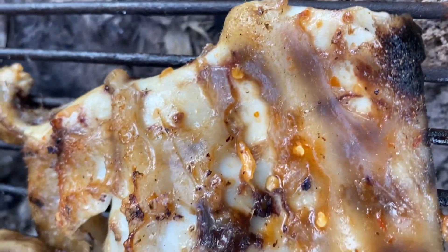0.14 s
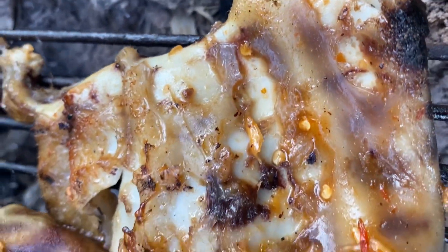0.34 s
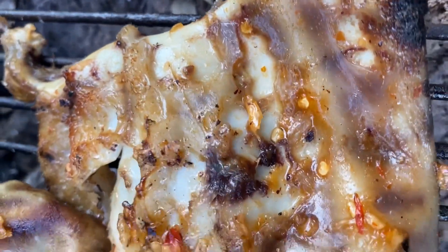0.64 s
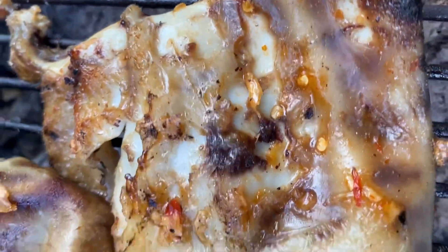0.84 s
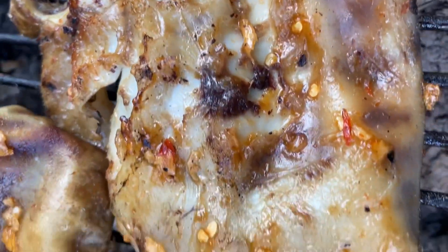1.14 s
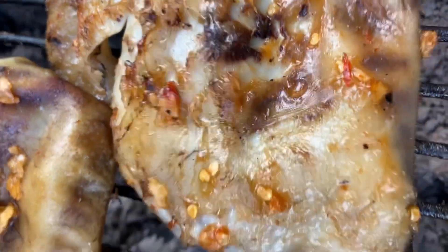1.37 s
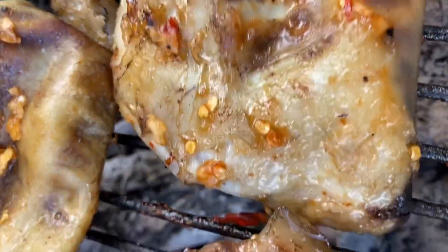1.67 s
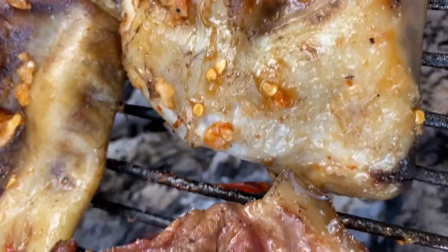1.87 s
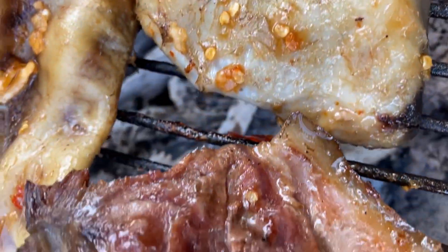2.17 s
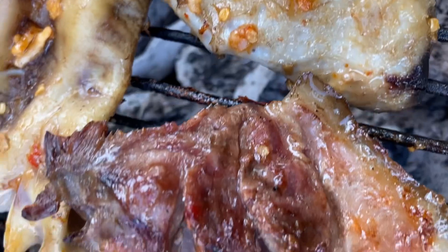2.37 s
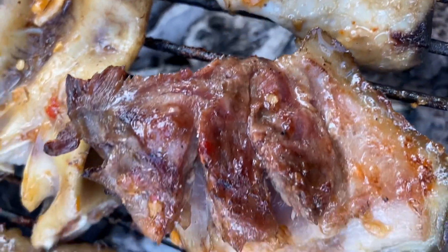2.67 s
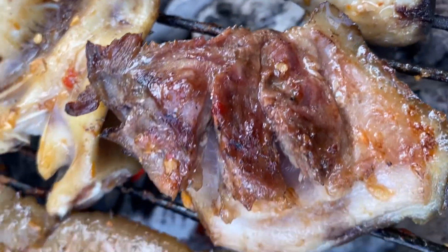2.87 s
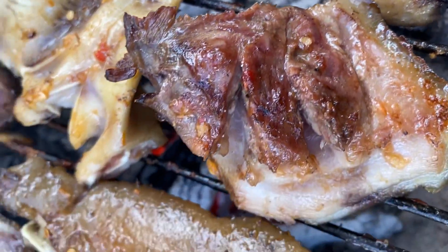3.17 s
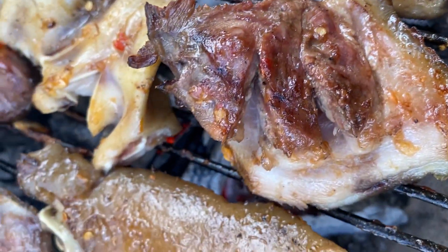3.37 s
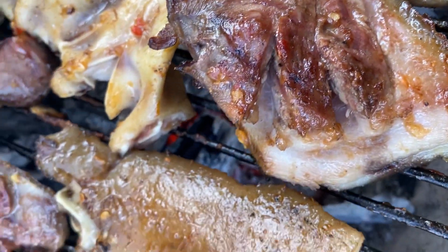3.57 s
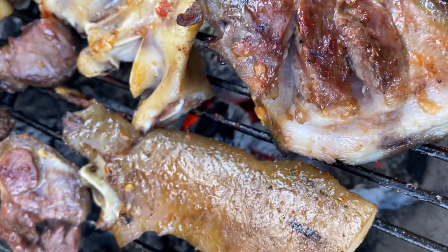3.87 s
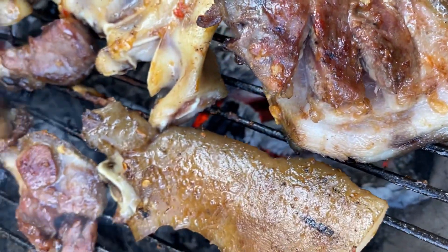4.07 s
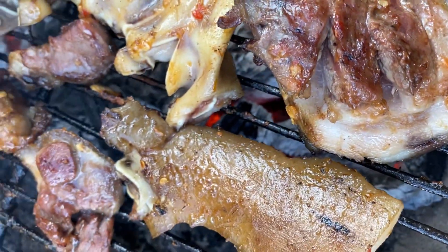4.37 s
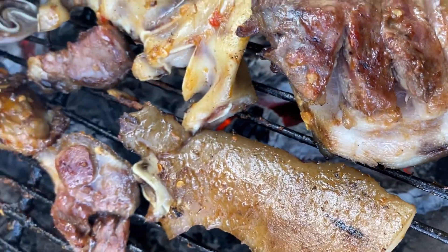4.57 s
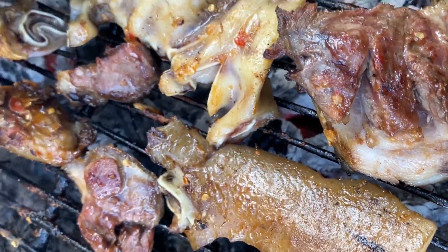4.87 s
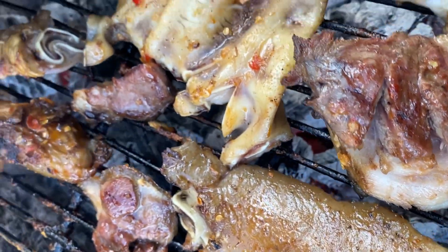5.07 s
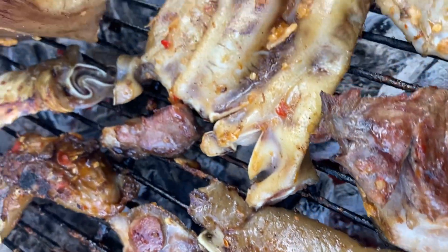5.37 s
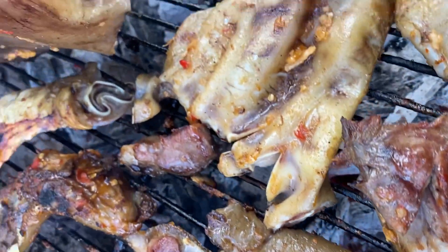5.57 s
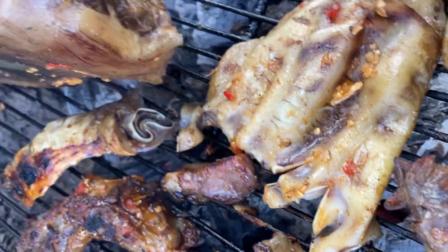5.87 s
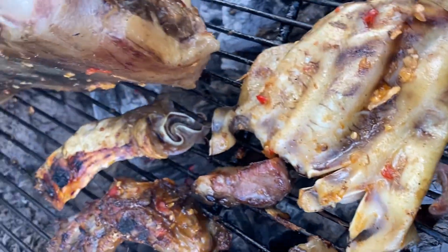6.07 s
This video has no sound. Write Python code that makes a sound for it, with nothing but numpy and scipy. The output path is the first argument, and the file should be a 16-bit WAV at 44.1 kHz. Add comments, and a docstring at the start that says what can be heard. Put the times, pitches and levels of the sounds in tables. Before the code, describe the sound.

Close outdoor grill sound in stereo, crisp and dry, with soft low rumble of fire and moving air throughout. At 0 s only a faint steady crackle and a few pops, one sharp at the start. From about 0.6 s fine, dense sizzling fades up and grows until 1.9 s; a tiny brittle charcoal clink comes at 1.1 s, a cluster of bright snaps around 1.3 s and a soft hollow blup at 1.7 s. At 2.3 s a drip hits the coals: a fuller steamy hiss pulses twice, with a barely audible moan and a swell of fire burble, gone by 3.1 s amid strong spits, the sharpest near 3.06 s. From 3.1 s a thinner, more uneven sizzle continues, dipping around 4.1 s, reviving with busier pops near 4.9 and 5.5 s, then easing by 6.2 s.

```python
"""Meat sizzles over charcoal outdoors while a handheld camera drifts close above it.
Ribs, a drip and a strip of skin sizzle as crowds of tiny noise bursts, each around its own pitch.
Bigger spits are sharp noise snaps; soft blups, a low gust thump and a faint high ping are short
sliding tones. The drip flashes to steam on the coals with a faint moan, a gliding tone. A lump of
charcoal clinks as fading tones. Shaped noise makes the fire burble and rumble; faint hums come and go."""
import sys
import numpy as np
from scipy import signal
from scipy.fft import rfft, irfft
from scipy.io import wavfile
from scipy.ndimage import uniform_filter1d

SR = 44100
rng = np.random.default_rng(int(sys.argv[2]) if len(sys.argv) > 2 else 0)


def persist_wave(psi):
    """Save psi, clipped to +-1, as 16-bit WAV."""
    counts = np.round(np.clip(psi, -1, 1) * 32767).astype(np.int16)
    wavfile.write(sys.argv[1], SR, np.atleast_2d(counts).T)


N = 275000
TIME = np.arange(N) / SR
HZ = np.fft.rfftfreq(N, 1 / SR)
EDGE_HZ = 15820  # nothing much is heard above this

# how strongly the ribs sizzle as the camera passes, before the fizz and fry trims: (time [s], level [dB])
RIBS_LEVEL = [(0.58, -57.5), (0.78, -46), (1.04, -45), (1.15, -40), (1.42, -40.5), (1.55, -38.5),
              (1.85, -37), (2.05, -41.5), (2.2, -41.5)]
# tone colour of the ribs: (frequency [Hz], relative level per Hz [dB])
RIBS_TONE = [(500, -4.5), (900, -18), (1400, -5.5), (1850, -10.5), (2700, 0), (3300, -1.5), (4200, -8),
             (5000, -2.5), (6100, -6.5), (7800, -2.5), (11500, -3.5), (13500, 0.5), (15500, -1.5)]


def ribs():
    """Fat on the ribs bursts in many tiny bubbles."""
    grains = bubbles(per_s=8000, spread_db=2.0, burst_s=0.0006, breadth=0.097, clump_db=2.0, hiss_db=-7)
    return sizzle(RIBS_LEVEL, RIBS_TONE, grains, fizz_db=-3.5, fry_db=-11.5, drying_db_per_s=0.54,
                  attack_s=0.015, release_s=0.045, low_hz=501, surge_db=1.5)


# how strongly the skin sizzles as the camera passes, before the fizz and fry trims: (time [s], level [dB])
SKIN_LEVEL = [(3.2, -45), (3.45, -44.5), (3.62, -41.5), (3.77, -45), (4.12, -51), (4.33, -46.5),
              (4.77, -47), (4.92, -41.5), (5.22, -44), (5.5, -42), (5.85, -45), (6.24, -52)]
# tone colour of the skin: (frequency [Hz], relative level per Hz [dB])
SKIN_TONE = [(500, 1), (900, -12), (1400, -6.5), (1900, -7), (2400, -5), (2850, -10.5), (3400, -2),
             (4100, -1), (4900, -5.5), (6000, -6), (7700, 0), (9300, -9.5), (11700, 2.5), (14000, -2),
             (15500, -4)]


def skin():
    """Fat on the strip of skin bursts in fewer, more uneven bubbles."""
    grains = bubbles(per_s=5000, spread_db=2.5, burst_s=0.0006, breadth=0.09, clump_db=1.65, hiss_db=-2.5)
    return sizzle(SKIN_LEVEL, SKIN_TONE, grains, fizz_db=-3.5, fry_db=-13.0, drying_db_per_s=0.9,
                  attack_s=0.11, release_s=.074, low_hz=568.0, surge_db=1.66)


# tone colour of the drip on the coals: (frequency [Hz], relative level per Hz [dB])
DRIP_TONE = [(400, 1), (750, 2.5), (1000, -10), (1600, -8.5), (2000, -2.5), (2400, -2), (3100, -6.5),
             (4250, -1), (5700, -9), (6300, -2), (7500, 2.5), (8400, -3), (11500, -1.56), (13000, 0.4),
             (15500, -6)]


def drip():
    """A drip boils away on the hot coals in longer bursts of steam."""
    grains = bubbles(per_s=8000, spread_db=3.5, burst_s=0.00088, breadth=0.1, clump_db=1.23, hiss_db=-4.5)
    return sizzle(boiling(), DRIP_TONE, grains, fizz_db=-2, fry_db=-9.0, drying_db_per_s=0.5,
                  attack_s=0.06, release_s=0.1, low_hz=298, surge_db=0.5)


DRIP_S, DRIP_LASTS_S = 2.27, .76  # when the drip lands, and how long until it is dry
SIMMER_DB, SIMMER_SAG_DB_PER_S = -39.5, 3  # the simmer starts here and sinks, before the trims
SETTLE_S = .09  # each flash fades back to the simmer
# the drip flashes into steam: (time after landing [s], level above the simmer [dB])
STEAM_FLASHES = [(0, 4.5), (0.12, 5), (0.27, 0.8)]


def boiling(count=84):
    """Traces the drip's level from its landing until it is dry, as rows (time [s], level [dB])."""
    s = DRIP_S + np.linspace(0, DRIP_LASTS_S, count)
    db = SIMMER_DB - SIMMER_SAG_DB_PER_S * (s - DRIP_S)
    for after_s, flash_db in STEAM_FLASHES:
        since_s = s - DRIP_S - after_s
        started = s >= DRIP_S + after_s
        db = db + flash_db * started * np.exp(-abs(since_s) / SETTLE_S)
    return np.transpose([s, db])


# tone colour of the whole grill: (frequency [Hz], relative level per Hz [dB])
GRILL_TONE = [(500, -7.5), (900, -11.5), (1400, -5), (2100, -3.5), (2700, -3), (3500, -5), (5500, -3),
              (8000, -2), (11500, 3), (15500, 0)]


def grill():
    """Bubbles all over the grill blend into a faint, steady crackle."""
    grains = bubbles(per_s=4500, spread_db=3.5, burst_s=0.0006, breadth=0.098, clump_db=0.5, hiss_db=-1.5)
    gain = amp(read(GRILL_TONE, HZ)) * high_pass(HZ, 710)
    return amp(-50.0) * unit(irfft(rfft(grains) * gain, N))


def sizzle(rows, colour, grains, fizz_db, fry_db, drying_db_per_s, attack_s, release_s, low_hz, surge_db):
    """Small bubbles fizz in the treble; larger wet ones fry below and slowly dry out."""
    s, db = np.transpose(rows)
    spectrum = rfft(grains) * amp(read(colour, HZ)) * high_pass(HZ, low_hz)
    small = high_pass(HZ, 6200) ** 4  # share of the small bubbles at each frequency
    fizz = irfft(spectrum * small, N) / band_rms(spectrum, 6500, 16000)
    fry = irfft(spectrum * (1 - small), N) / band_rms(spectrum, 2000, 6000)
    surging_db = np.interp(TIME, s, db) + surge_db * drift(7.8)
    level = amp(surging_db) * presence(s[0], s[-1], attack_s, release_s)
    drying_db = fry_db - drying_db_per_s * (TIME - s[0])
    return level * (fizz * amp(fizz_db) + fry * amp(drying_db))


def bubbles(per_s, spread_db, burst_s, breadth, clump_db, hiss_db, count=64, size=256):
    """Tiny bursts of uneven size, each around its own pitch, come in clumps over a hiss of vapour."""
    t = np.arange(size) / SR
    height = np.sqrt(np.linspace(0, 1, size // 2 + 1))  # pitch scale: 0 lowest, 1 highest
    out = np.zeros((2, N))
    for pitch in np.linspace(0, 1, count):
        ring = causal(np.exp(-((height - pitch) / breadth) ** 2) + 0.019)
        noise = unit(rng.standard_normal((2, size)) * np.exp(-t / burst_s))
        burst = irfft(rfft(noise) * ring)
        # the pitches share the per_s bursts, which start at random moments
        chance = rng.random(N) * SR * count / per_s
        at = np.flatnonzero(chance < 1)
        # most bursts are small and a few are much louder
        strength = amp(spread_db * np.minimum(-np.log(chance[at] + 1e-9), 5))
        place = (at[:, None] + np.arange(size)).ravel()
        for port in range(2):
            out[port] += np.bincount(place, np.outer(strength, burst[port]).ravel(), N)[:N]
    vapour = amp(hiss_db) * rng.standard_normal((2, N))
    return unit((unit(out) + vapour) * amp(clump_db * drift(61)))


SOUND_M_PER_S = 343
# the camera slowly draws back, so the reflection travels further: (time [s], extra path [m])
REFLECTION_PATH = [(0, .226), (0.5, .253), (1.5, .265), (3.6, .272), (4.3, .275), (5.1, .305), (5.6, .317),
                   (6.24, .345)]


def glance(pair, echo_db):
    """Adds a reflection off the meat; as its path grows, its colouring sinks in pitch."""
    delay_s = np.interp(TIME, *np.transpose(REFLECTION_PATH)) / SOUND_M_PER_S
    earlier = TIME - delay_s
    echo = np.array([np.interp(earlier, TIME, x) for x in pair])
    return pair + amp(echo_db) * echo


def meat():
    """Joins all the sizzling; the direct sound of grill, ribs and skin also reflects off the meat."""
    return glance(grill() + ribs() + skin(), echo_db=-11.0) + drip()


# a bright pop rings high, a dull one low
POP_RING_HZ, RING_OCTAVES_PER_TILT, TOP_RING_HZ = 4470, 0.45, 12500
# the loudest spits of fat and cracks of charcoal, before a common trim:
# (time [s], level [dB], treble tilt [dB per octave], decay [s])
LOUD_SPITS = [(0.064, -27, -4.5, 0.0011), (0.086, -38, -2, 0.00063), (0.1659, -45, 13.5, .0005),
              (0.2762, -39, 1, .0008), (0.311, -42, -5.5, 0.0018), (0.3568, -35.5, 7, 0.00054),
              (0.457, -38.5, 1, 0.00076), (0.6475, -40, -3, 0.00073), (0.7806, -34, 3, 0.00059),
              (0.821, -56, 3, .0009), (0.9065, -32, 2.5, 0.00056), (0.9563, -33, 3, 0.00043),
              (0.9686, -39, 9, .0006), (0.9934, -34, 7, 0.00048), (1.0003, -33.5, 4, 0.00074),
              (1.0931, -33, 1, 0.00076), (1.1127, -27, -1, 0.00047), (1.1143, -34, 9, 0.0017),
              (1.1205, -48, 1.5, 0.0017), (1.1599, -37, -1.5, 0.00069), (1.2606, -37, 6, 0.00043),
              (1.2854, -30, 15, .0004), (1.3001, -38, 1, .0005), (1.3111, -26, 2, 0.00054),
              (1.3318, -25, 4, .0005), (1.3504, -41, 4, 0.00089), (1.3608, -25, 8, 0.0011),
              (1.4303, -32, 3, .0005), (1.4388, -29, 11, .0005), (1.4499, -26, 10, .0005),
              (1.464, -31.5, 1.5, 0.00049), (1.5872, -39, 8, .0005), (1.6366, -37, 1, .0006),
              (1.7017, -30.5, -7, 0.0005), (1.7596, -28, 3, 0.00066), (1.9217, -32, 3, 0.00046),
              (1.9412, -32.5, 3, .0005), (1.9817, -39, 5, .0005), (2.0158, -37, 9, .0005),
              (2.0212, -29, 0.5, 0.00098), (2.039, -43.5, -4.5, .0006), (2.1442, -41, 0, 0.00055),
              (2.1493, -25, 4, 0.0015), (2.2128, -32, 9, .0008), (2.2427, -40, 13, .0007),
              (2.2782, -29, 7, 0.00072), (2.3029, -23, 0, 0.0018), (2.3221, -37, -6.5, 0.00051),
              (2.3452, -25, 11, .0006), (2.3508, -26, -0.5, 0.00055), (2.4095, -25, 7, 0.00072),
              (2.5566, -26, 11, 0.00054), (2.5955, -37, 5, .0005), (2.6174, -27, 0, 0.00049),
              (2.6865, -32, 7, .00076), (2.7117, -32, 0, .0006), (2.7407, -29, 5, .0006),
              (2.7445, -28, 0.5, 0.00081), (2.8262, -36, -3, 0.0011), (2.8601, -29, 0, .0007),
              (2.8892, -30, -1, 0.00066), (2.9024, -23, 6, .001), (2.9095, -28, 10, .0005),
              (2.9267, -37, 0, .0006), (2.9672, -33.5, -1, .0009), (3.0004, -29, 3, .0006),
              (3.0575, -16, 5, 0.00044), (3.1001, -40, 3, 0.00068), (3.1507, -25, 0, 0.00059),
              (3.1993, -29, 13, 0.00074), (3.2165, -34, 13, 0.00052), (3.2579, -35, 10, .0005),
              (3.2702, -28.5, 4, 0.00073), (3.281, -30, 3, 0.0005), (3.323, -31.5, 1, 0.00063),
              (3.3309, -26, 10, 0.00079), (3.4347, -31, 10, .0005), (3.4473, -35, -1, 0.00048),
              (3.4607, -30.5, 6, 0.00082), (3.5724, -35.5, 4, .0005), (3.5076, -41, -6, .0007),
              (3.6305, -34, 0.5, .0007), (3.6718, -33, 3, .0006), (3.7556, -44, -3, .0008),
              (3.7715, -41, -2, .0008), (3.8399, -36, 1, 0.00055), (3.8558, -42, 2, .0006),
              (3.937, -31, 5, .00053), (4.0693, -37, 3, .0005), (4.2098, -43, -5, .0006),
              (4.2815, -37, 1, .0005), (4.2874, -35, 9, 0.00046), (4.3228, -41, 0.5, 0.00069),
              (4.3589, -32.5, 1, 0.00049), (4.464, -36, -1.5, 0.00037), (4.5316, -35, 1, .0005),
              (4.5466, -33, 9, .0006), (4.5687, -38, 13, 0.00046), (4.6177, -33.5, 1, .0006),
              (4.6575, -32, -1, 0.00043), (4.6616, -30, 8, 0.00076), (4.6871, -40, 7, .0005),
              (4.7712, -28, 4.5, 0.00035), (4.7802, -37, -3, 0.00085), (4.8448, -49, 5, .0006),
              (4.859, -32, 0, 0.0013), (4.8864, -25.5, 2, 0.00085), (4.9461, -35, -1, 0.0006),
              (4.9796, -39, 4, 0.00045), (5.0263, -31, 21, .0004), (5.036, -32, 12, .0004),
              (5.074, -29, 2.5, 0.002), (5.0978, -36, 8, .0005), (5.1075, -42, -9, 0.00073),
              (5.1544, -46, 2, .0006), (5.3594, -39, -8, 0.00055), (5.3815, -31, 6, 0.0007),
              (5.409, -31.5, 0, 0.00066), (5.4269, -44, 6, .0005), (5.4609, -34, 2, .0006),
              (5.5003, -26.5, 0.5, 0.0015), (5.5218, -28, 17, .0004), (5.548, -29, 4, 0.00058),
              (5.553, -38, 4, 0.00066), (5.585, -28.5, 5, 0.00066), (5.6159, -33, 6, .0005),
              (5.6695, -42, -0.5, 0.00072), (5.7124, -34, 8, .0005), (5.7239, -35, 8, .0005),
              (5.8412, -38, 17, .0005), (5.8865, -31, 7, .0005), (5.8988, -34, 1, 0.00088),
              (5.9825, -37, -3, .0008), (5.9882, -27, 1.5, 0.0038), (6.0913, -43, -1, .0006),
              (6.1182, -41, 2, .0006), (6.1915, -46, -8, .0005)]


def spits(frying):
    """Loud spits at set moments join lesser ones that follow the frying."""
    lesser = small_spits(frying, above_db=-7.0, spread_db=0, tilt_db=0.5, tilt_spread_db=4.5,
                         decay_s=0.00027)
    return pops([*LOUD_SPITS, *lesser], level_db=-1.0, ring_db=1.5, ring_width=0.29,
                spray_db=-26, spray_s=0.043, low_hz=313)


def pops(rows, level_db, ring_db, ring_width, spray_db, spray_s, low_hz, size=2048):
    """A blister snaps open and throws a short, faint spray of droplets."""
    out, t, hz = np.zeros((2, N)), np.arange(size) / SR, np.fft.rfftfreq(size, 1 / SR)
    for s, db, tilt_db, decay_s in rows:
        ring_hz = min(POP_RING_HZ * 2 ** (RING_OCTAVES_PER_TILT * tilt_db), TOP_RING_HZ)
        envelope = np.exp(-t / decay_s) + amp(spray_db) * np.exp(-t / spray_s)
        slope_db = tilt_db * np.log2(np.clip(hz, 900, 11000) / 4000)
        ring = np.exp(-(np.log((hz + 1) / ring_hz) / ring_width) ** 2)
        gain = amp(slope_db + ring_db * ring) * high_pass(hz, low_hz) / (1 + (hz / EDGE_HZ) ** 20)
        snap = irfft(rfft(rng.standard_normal((2, size)) * envelope) * causal(gain))
        # equal energy for every snap, as if packed into one millisecond
        snap /= np.sqrt(np.sum(snap ** 2, 1, keepdims=True) / (SR * .001))
        add(out, s, amp(db + level_db) * snap)
    return out


def small_spits(frying, above_db, spread_db, tilt_db, tilt_spread_db, decay_s, count=150):
    """Lesser spits come at random, more and louder where the meat fries harder: rows as for pops."""
    power = uniform_filter1d(np.mean(frying ** 2, 0), SR // 5) + 1e-12
    due = np.cumsum(power ** (1 / 4))
    when, strength, bright = rng.random((count, 3)).T
    s = np.interp(when, due / due[-1], TIME)
    frying_db = 10 * np.log10(np.interp(s, TIME, power))
    db = frying_db + above_db + spread_db * (2 * strength - 1)
    tilt = tilt_db + tilt_spread_db * (2 * bright - 1)
    return np.transpose([s, db, tilt, np.full(count, decay_s)])


# soft blups, a low gust thump and a faint high ping, before the swell shape and a common trim:
# (time [s], level [dB], first pitch [Hz], last pitch [Hz], length of the slide [s])
SHORT_TONES = [(0.061, -40, 397, 200, 0.02), (0.135, -35.5, 564, 264, 0.0075),
               (0.473, -43.5, 430, 324, 0.018), (0.645, -44, 900, 746, 0.0057),
               (0.818, -43, 950, 600, 0.0044), (1.11, -35.5, 475, 300, 0.0074),
               (1.258, -28.5, 605, 280, 0.0057), (1.265, -33, 504, 400, 0.012),
               (1.7, -19.5, 750, 149, 0.0086), (2.816, -41, 640, 556, 0.017),
               (3.366, -26.5, 67.4, 72.6, 0.044), (3.573, -35.5, 340, 190, 0.015),
               (4.534, -47, 1760, 1910, .018), (4.999, -43.5, 444, 423, .026),
               (5.237, -36, 263, 174, 0.038)]


def short_tones(level_db):
    """Each is a short swelling tone that slides in pitch."""
    out = np.zeros((2, N))
    for s, db, first_hz, last_hz, length_s in SHORT_TONES:
        u = np.arange(int(2 * length_s * SR)) / (length_s * SR)  # 1 when the slide ends
        hz = first_hz * (last_hz / first_hz) ** np.minimum(u, 1)
        swell = (u / 0.52) ** 2 * np.exp(2 * (1 - u / 0.46))
        tone = np.sin(2 * np.pi * np.cumsum(hz) / SR)
        add(out, s, amp(db + level_db) * swell * tone)
    return out


# a lump of charcoal splits in a quick run of snaps, before a common trim: (time [s], level [dB])
LUMP_SNAPS = [(1.1124, -39), (1.1141, -29), (1.1208, -38)]
# what the lump rings with: (frequency [Hz], level [dB], time to fade by 60 dB [s])
LUMP_RINGS = [(1360, -5, .015), (2650, -6, 0.027), (3320, -2.5, 0.029), (3650, -2, .012),
              (4760, -12, 0.032), (7220, -3, .025)]


def charcoal(level_db):
    """Each snap sets the brittle lump clinking at several pitches."""
    out, t = np.zeros((2, N)), np.arange(SR // 10) / SR
    for s, db in LUMP_SNAPS:
        clink = np.zeros((2, len(t)))
        for hz, mode_db, t60 in LUMP_RINGS:
            tone = np.sin(2 * np.pi * (hz * t + rng.random((2, 1))))
            clink += amp(mode_db - 60 * t / t60) * tone
        add(out, s, amp(db + level_db) * clink)
    return out


# steam moaning from the drip, before the left and right trims:
# (start [s], length [s], pitch [Hz], glide [Hz per s], level [dB])
STEAM_MOAN = (2.3, 0.36, 388, 100, -49.5)


def moan():
    """Steam escaping from the drip sounds a faint rising note, almost all on the right."""
    return note(STEAM_MOAN, left_db=-24.5, right_db=1.0, waver=0.0052, fade_s=0.073)


FLARE_DB, FLARE_DECAY_S = 10.5, 0.65  # the fire flares when the drip lands
# the burble without the flare, stronger under the ribs and fading as the camera leaves:
# (time [s], level [dB])
BURBLE_LEVEL = [(0.4, -58), (1.2, -53.5), (2.05, -56.5), (3.3, -59), (3.75, -54), (4.4, -55), (5.1, -55),
                (5.9, -62)]
# tone colour of the burble: (frequency [Hz], relative level per Hz [dB])
BURBLE_TONE = [(100, -11), (200, 4.5), (290, 0.5), (380, -2), (550, -7), (750, -12.5), (1100, -14.5),
               (2500, -24.5)]


def burble(flutter_db):
    """Hot gas flutters among the coals, uneven and hollow."""
    flare = (TIME > DRIP_S) * np.exp(-abs(TIME - DRIP_S) / FLARE_DECAY_S)
    db = np.interp(TIME, *np.transpose(BURBLE_LEVEL)) + FLARE_DB * flare
    gas = rng.standard_normal((2, N)) * amp(flutter_db * drift(26))
    return unit(irfft(rfft(gas) * amp(read(BURBLE_TONE, HZ)), N)) * amp(db)


# level of the rumble, with swells and lulls in the breeze: (time [s], level [dB])
RUMBLE_LEVEL = [(0, -43.5), (0.17, -37.5), (0.3, -46), (0.4, -41), (0.66, -45.5), (0.78, -42),
                (2.02, -42.5), (2.18, -41.5), (2.31, -44.5), (2.68, -43), (2.82, -39.5), (2.92, -43.5),
                (3.85, -40), (4.45, -43), (4.6, -48), (4.9, -38), (5.5, -42.5), (6.24, -40.5)]
# tone colour of the rumble: (frequency [Hz], relative level per Hz [dB])
RUMBLE_TONE = [(20, -40), (31, -25), (41, -2.5), (55, -4.5), (68, 3.5), (78, -1), (90, -1), (110, -3.5),
               (150, -8.5), (220, -26.5), (400, -38.5), (1400, -73)]


def rumble(lump_db, lump_hz):
    """Moving air and fire make a lumpy low noise."""
    s, db = np.transpose(RUMBLE_LEVEL)
    noise = rng.standard_normal((2, N))
    air = unit(irfft(rfft(noise) * amp(read(RUMBLE_TONE, HZ)), N))
    return air * amp(np.interp(TIME, s, db) + lump_db * drift(lump_hz))


# faint low hums that come and go, before the left and right trims:
# (start [s], length [s], pitch [Hz], glide [Hz per s], level [dB])
LOW_HUMS = [(0.692, 0.46, 311.7, -30.5, -63), (4.196, 0.3, 219.4, -12.5, -57),
            (5.698, 0.33, 181.5, -14.5, -57)]


def hums():
    """Faint low notes sink slowly in pitch, louder on the right."""
    return sum(note(row, left_db=-3.0, right_db=3.0, waver=0.018, fade_s=0.061) for row in LOW_HUMS)


def note(row, left_db, right_db, waver, fade_s):
    """A sine wave glides slowly while its pitch and loudness waver."""
    start_s, length_s, hz, glide_hz_per_s, db = row
    pitch = (hz + glide_hz_per_s * (TIME - start_s)) * (1 + waver * drift(30.7))
    level = amp(db + drift(30)) * presence(start_s, start_s + length_s, fade_s, fade_s)
    tone = np.sqrt(2) * np.sin(2 * np.pi * np.cumsum(pitch) / SR)
    return amp([[left_db], [right_db]]) * level * tone


# above LAG_FROM_HZ the left lags; the two sides line up again at IN_STEP_HZ
PORT_LAG_S, IN_STEP_HZ, LAG_FROM_HZ = .000239, 6950, 6400
# how alike the two microphone ports are: (frequency [Hz], likeness [-1 opposite to 1 same])
PORT_LIKENESS = [(110, .99), (200, .93), (330, .82), (600, .6), (950, .1), (1500, -.42), (2000, .2),
                 (2400, .5), (2900, .3), (4200, .7), (5700, .35), (6500, .97), (16000, .97)]
# balance of the two ports: (frequency [Hz], left minus right [dB])
PORT_BALANCE = [(100, -1.5), (350, -3), (600, 1), (1000, 0.5), (2000, 3), (4200, 4.5), (5700, 6.5),
                (6500, 0), (16000, 0)]


def ports(pair):
    """Blends two unrelated versions of the sound into left and right; in the treble the left lags."""
    a, b = rfft(pair)
    same = np.clip(read(PORT_LIKENESS, HZ), -1, 1)
    lean = amp(read(PORT_BALANCE, HZ))
    lag = np.exp(-2j * np.pi * PORT_LAG_S * (HZ - IN_STEP_HZ) * (HZ > LAG_FROM_HZ))
    left = a * lean * lag
    right = same * a + np.sqrt(1 - same ** 2) * b
    keep_power = np.sqrt(2 / (1 + lean ** 2))
    return irfft(np.array([left, right]) * keep_power, N)


def amp(db):
    """Turns decibels into gain."""
    return 10 ** (np.asarray(db) / 20)


def unit(x):
    """Scales a sound to an average (rms) level of 1."""
    return x / np.sqrt(np.mean(x ** 2) + 1e-20)


def read(points, hz):
    """Reads a tone colour between its points, on a log-frequency axis."""
    f, value = np.transpose(points)
    return np.interp(np.log(hz + 1), np.log(f + 1), value)


def add(mix, s, sound):
    """Mixes a sound in at time s."""
    part = mix[:, max(round(s * SR), 0):][:, :sound.shape[-1]]
    part += sound[..., :part.shape[1]]


def drift(rate_hz):
    """Makes a slow random motion of rms 1 by smoothing noise."""
    smooth = 1 / (1 + (HZ / rate_hz) ** 2)
    return unit(irfft(rfft(rng.standard_normal(N)) * smooth, N))


def high_pass(hz, edge_hz):
    """Gives the gain of a third-order high-pass, which weakens sound below its edge."""
    return 1 / np.sqrt(1 + (edge_hz / (hz + 1)) ** 6)


def band_rms(spectrum, lo, hi):
    """Finds the level of one band of a spectrum."""
    band = spectrum[:, (HZ > lo) & (HZ < hi)]
    return np.sqrt(2 * np.mean(np.sum(abs(band) ** 2, 1))) / N


def causal(gain):
    """Makes a filter of this gain that rings after a click, never before (minimum phase)."""
    log_gain = np.log(np.r_[gain, gain[-2:0:-1]] + 1e-4)
    return np.exp(np.conj(signal.hilbert(log_gain)))[:len(gain)]


def presence(start_s, end_s, attack_s, release_s):
    """Fades in before the start, holds, and fades out after the end."""
    return np.interp(TIME, [start_s - attack_s, start_s, end_s, end_s + release_s], [0, 1, 1, 0])


def scene():
    """Mixes everything on and around the grill."""
    frying = meat()
    snaps = spits(frying) + charcoal(level_db=-1)
    fire = burble(flutter_db=2.5) + rumble(lump_db=0.43, lump_hz=6.4)
    tones = short_tones(level_db=-3.5) + moan() + hums()
    return ports(frying + snaps + fire) + tones


def record(dry):
    """Cuts off the treble above the upper edge with a steep filter."""
    low_pass = signal.firwin(511, EDGE_HZ, window=("kaiser", 9), fs=SR)
    return signal.oaconvolve(dry, low_pass[None], "same")


dry = scene()
out = record(dry)
persist_wave(out)
```